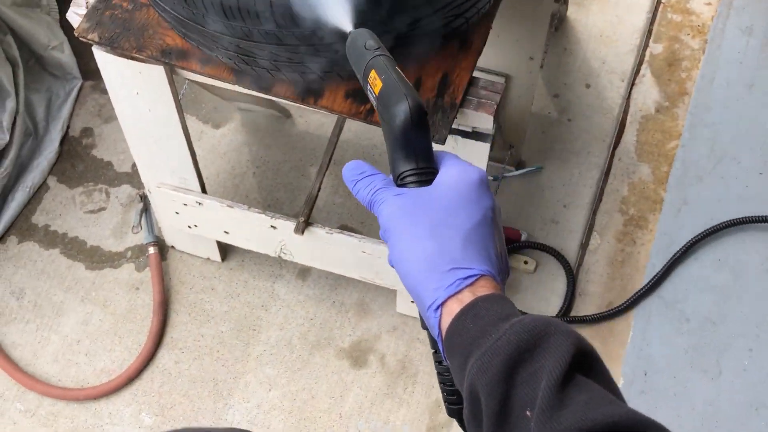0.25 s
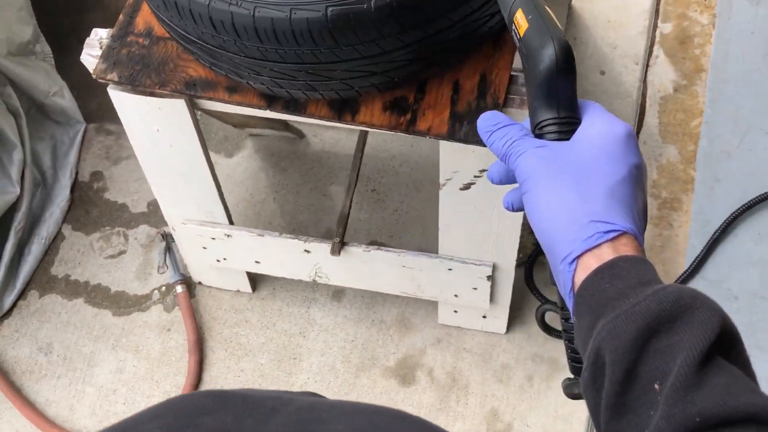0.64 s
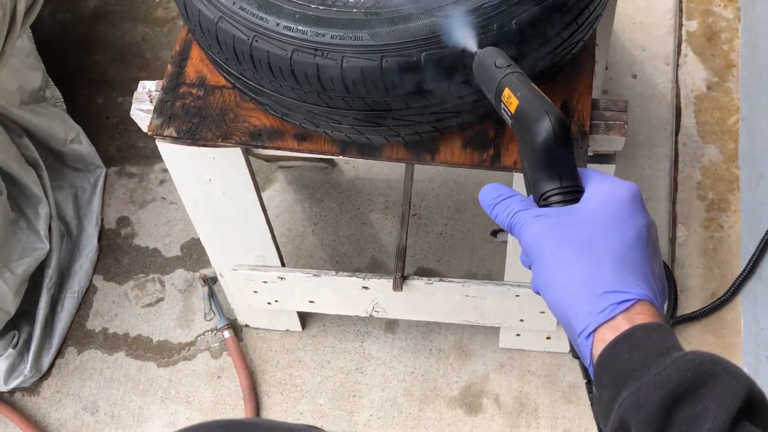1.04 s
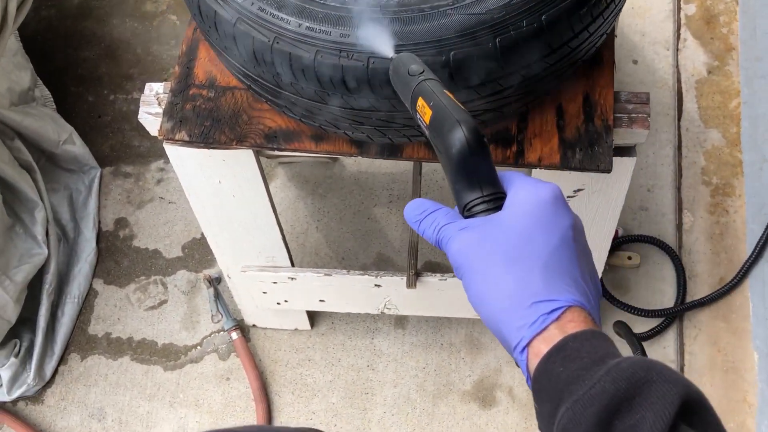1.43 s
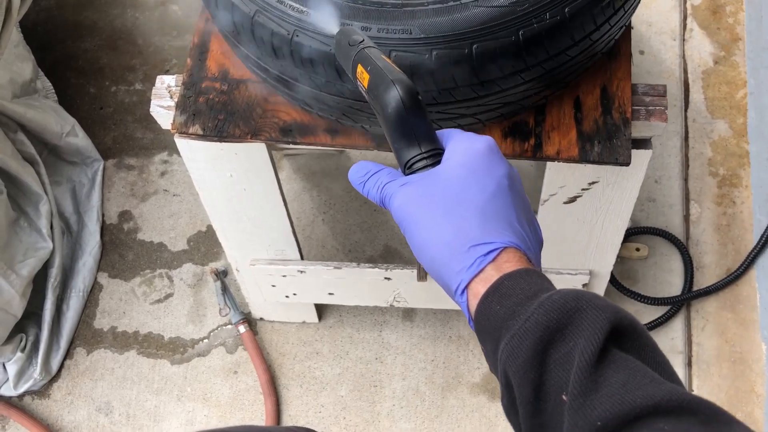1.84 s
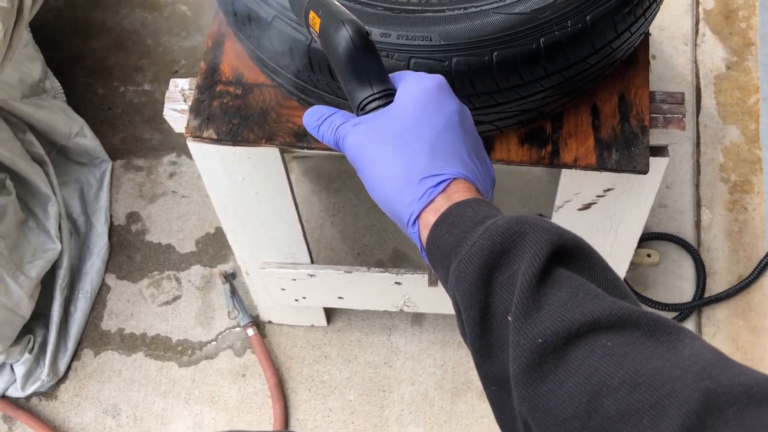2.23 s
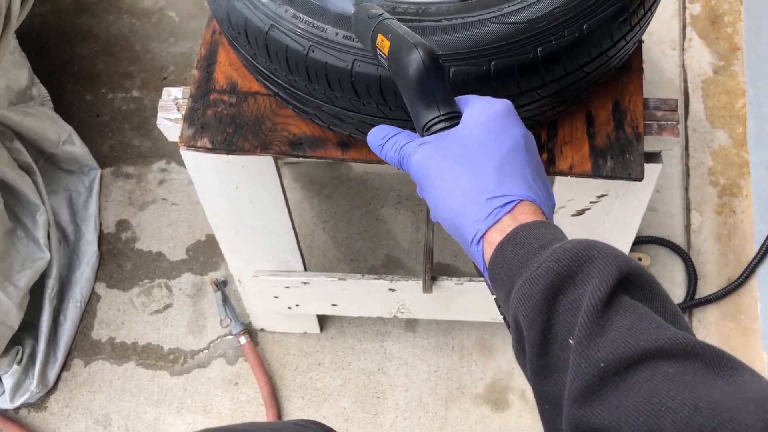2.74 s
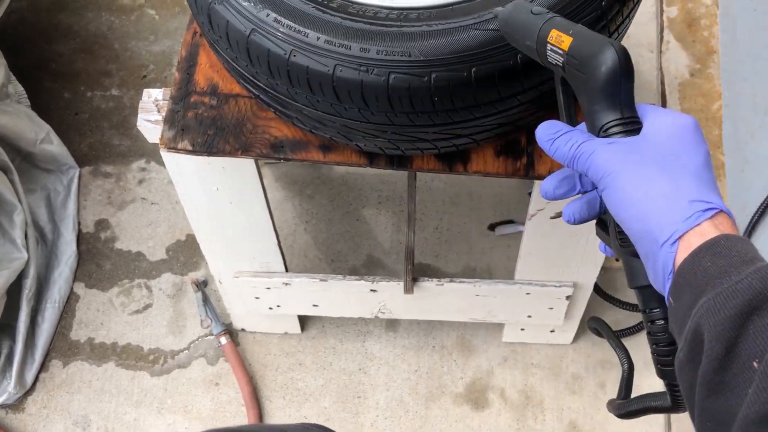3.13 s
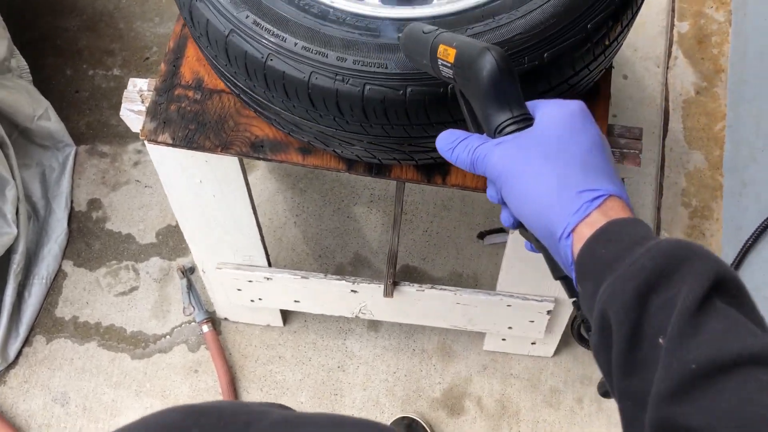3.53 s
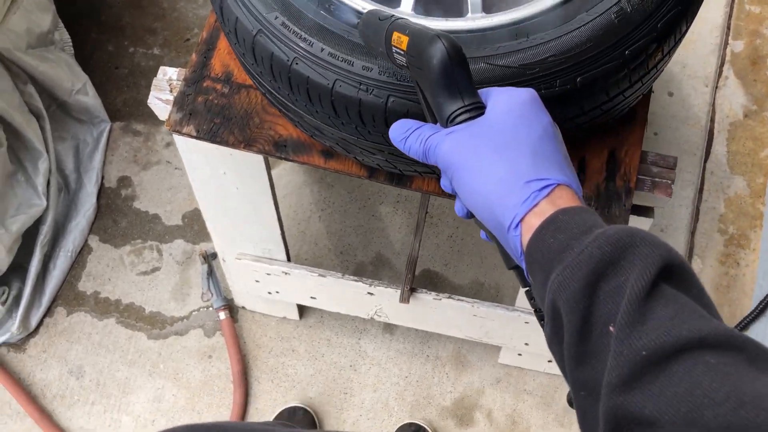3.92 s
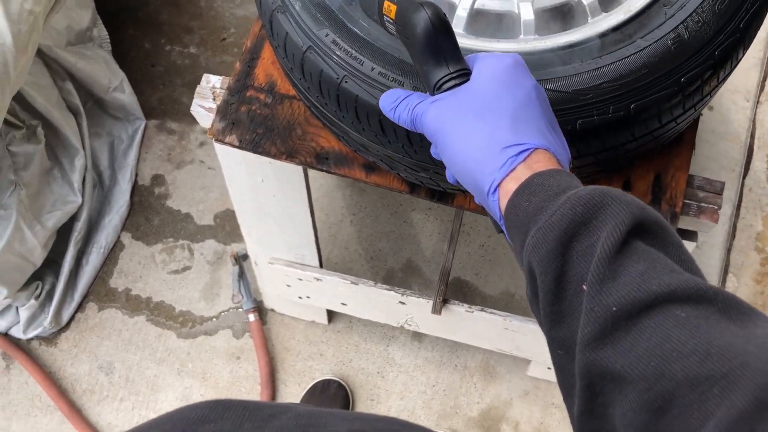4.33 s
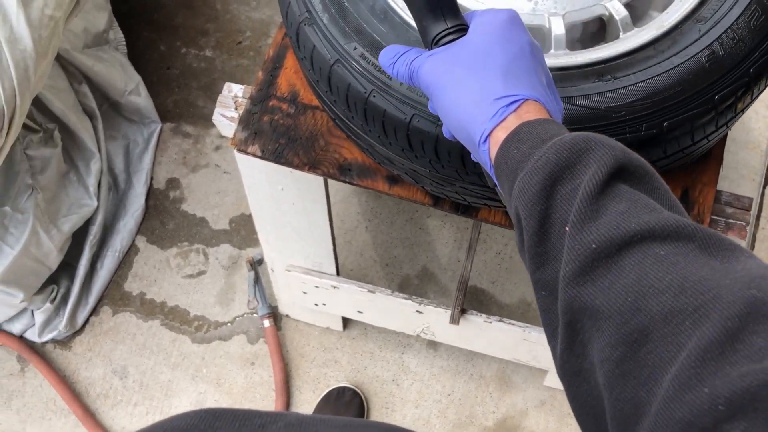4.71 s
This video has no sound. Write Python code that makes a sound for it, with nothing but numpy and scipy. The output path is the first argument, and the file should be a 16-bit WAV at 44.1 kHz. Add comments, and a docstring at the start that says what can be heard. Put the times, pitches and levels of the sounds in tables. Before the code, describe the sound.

Three bursts of bright, crackling steam hiss, heard very close in mono. The first is short and sputtering, the second lasts about two seconds, the third continues to the end. Shifting echoes off tyre and metal colour the hiss, over faint hollow roar and air buffeting. Brief pauses reveal trigger clicks, a low noisy machine hum and the workshop's fading ring.

```python
"""A hand-held steam gun sprays a car wheel in a workshop in three bursts, close to a mono microphone.
The jet is hissing noise with sparse droplet crackle; short moving echoes off the wheel draw bands through it.
Steam makes noise ring in the hollows of the wheel, gusts buffet the microphone and water coughs from the nozzle.
The first burst is already under way and the last runs to the end; in the pauses a machine hums in noisy bands,
the room rings out and the trigger clicks."""
import sys
import numpy as np
from scipy import signal
from scipy.fft import rfft, irfft
from scipy.io import wavfile
from scipy.ndimage import uniform_filter1d, map_coordinates

SR = 44100
rng = np.random.default_rng(int(sys.argv[2]) if len(sys.argv) > 2 else 0)


def to_wav(s):
    """Save 16-bit WAV."""
    ch = np.atleast_2d(s).T  # columns
    pcm = np.round(np.clip(ch, -1, 1) * 32767)  # PCM
    wavfile.write(sys.argv[1], SR, pcm.astype(np.int16))


N = 218898  # samples


def gain_of(db):
    """Turns decibels into an amplitude factor."""
    return 10 ** (np.asarray(db) / 20)


def evened(x):
    """Brings a signal to an rms of one."""
    return x / np.sqrt(np.mean(x ** 2) + 1e-20)


def level_at(points, hz):
    """Reads a spectrum between its points, along a logarithmic frequency scale."""
    point_hz, db = np.transpose(points)
    return np.interp(np.log(hz + 1), np.log(point_hz + 1), db)


def wander(db, seconds):
    """Random level changes: db is their rms size, seconds the length of the smoothing window."""
    window = np.hanning(round(seconds * SR))
    smooth = signal.oaconvolve(rng.standard_normal(N), window, "same")
    return gain_of(db * evened(smooth))


def coloured(x, points, patchy_db):
    """Shapes a sound by a spectrum, lets patches of it drift in level and evens the result."""
    size, hop = 1024, 256  # samples
    hz = np.fft.rfftfreq(N, 1 / SR)
    shaped = irfft(rfft(x) * gain_of(level_at(points, hz)), N)
    z = signal.stft(shaped, nperseg=size, noverlap=size - hop)[2]
    patches = rng.standard_normal(z.shape[::-1]).T
    patches = uniform_filter1d(patches, size=50, axis=1)  # along time
    patches = evened(uniform_filter1d(patches, size=4, axis=0))  # along frequency
    patchy = signal.istft(z * gain_of(patchy_db * patches), nperseg=size, noverlap=size - hop)[1]
    return evened(patchy[:N])


def spray_db(axis):
    """One layer's level over time at full pressure, as the gun works over the wheel."""
    # Spray levels before pressure, fluctuation and mixing. Each row: time in seconds, then levels in dB of
    # the hiss, the splash on the wheel, the broad roar, the lower hollow and the upper hollow.
    spray = [(0, -14, -22.5, -38.5, -40, -50), (.3, -13.5, -22.5, -37, -47, -48),
             (.4, -15.5, -19.5, -31, -38, -43), (.86, -14.5, -28.5, -41.5, -48.5, -54.5),
             (1.2, -12.5, -23.5, -40, -39.5, -49), (1.5, -14.5, -27.5, -41.5, -46, -54),
             (1.9, -14, -27, -43.5, -46.5, -52), (2.3, -15, -23, -41, -43, -55),
             (2.6, -14.5, -25, -41.5, -41.5, -46.5), (2.8, -13.5, -27, -39, -35, -41),
             (2.9, -12.5, -19.5, -36, -32, -50), (3.3, -13.5, -27, -38, -42, -46),
             (3.5, -14, -25, -37, -38, -43.5), (3.9, -14, -26, -35.5, -39, -42.5),
             (4.3, -14, -23.5, -37, -34, -39.5), (4.55, -15.5, -25, -38, -35.5, -45),
             (4.75, -13, -24.5, -40.5, -35, -44.5), (4.96, -15.5, -26, -39, -40.5, -48)]
    rows = np.array(spray)
    return np.interp(np.arange(N) / SR, rows[:, 0], rows[:, axis])


def played(db, follows, rise_s):
    """Trigger builds pressure up, holds it and bleeds it off; a layer follows by its own share of the dB."""
    # Pulls of the trigger. Each row: pulled in seconds, pressure build-up in seconds, let go in seconds.
    bursts = [(-1, .01, .35), (.787, .028, 2.82), (3.24, .005, 6)]
    start_db = -6  # pressure of the first steam, below full
    bleed_s, bleed_db_per_s, shut_db_per_s = .16, -105, -420  # the hose empties, then the flow breaks off
    t, out = np.arange(N) / SR, np.zeros(N)
    for pulled, build, let_go in bursts:
        pressure_db = start_db * np.clip(1 - (t - pulled) / build, 0, 1)
        pressure_db = pressure_db + bleed_db_per_s * np.clip(t - let_go, 0, bleed_s)
        shut_db = shut_db_per_s * np.maximum(t - let_go - bleed_s, 0)
        onset = np.clip((t - pulled) / rise_s, 0, 1)
        out += onset * gain_of(follows * pressure_db + shut_db)
    return out * gain_of(db)


def steam():
    """The free jet carries the top; its impact on rubber and metal fills the middle and a broad roar."""
    # Spectra of the free jet, its splash on the wheel and the broad roar.
    # Each row: frequency in Hz, relative density in dB per Hz.
    jet_spectrum = [(1000, -68), (2940, -45), (5000, -12), (6450, -6.5), (9040, 0), (11100, 1), (13000, 1),
                    (15100, 3.5), (16000, -5)]
    splash_spectrum = [(300, -55), (1000, -24), (2200, -13.5), (2600, -7), (3500, -5), (5230, -4),
                       (6320, -4.5), (7000, -2), (9100, -8), (15400, -58)]
    wash_spectrum = [(60, -44), (130, -22), (200, -2), (350, 6), (600, 0.5), (1000, -1), (1500, -2),
                     (2100, -3.5), (2400, -5.5), (3200, 0.5), (6000, -48.5)]
    sputter = wander(0.89, 0.032) * wander(0.53, 0.0019) * wander(0.39, 0.12)
    jet = coloured(turbulence(-8, 1500), jet_spectrum, 0.86)
    jet = jet * played(spray_db(axis=1), 0.97, 0.0038)
    splash = coloured(turbulence(-10.5, 1200), splash_spectrum, 0.67)
    splash = splash * played(spray_db(axis=2), 0.75, 0.003) * wander(1.46, 0.2)
    wash = coloured(rng.standard_normal(N), wash_spectrum, 2.1)
    wash = wash * played(spray_db(axis=3), 0.35, 0.0055) * wander(1.9, 0.092)
    direct = echoed(jet + splash) * sputter + gain_of(1.5) * wash
    return reflected(direct, -7.5, 0.13) + room_tail(direct, -30.5, 1.0)


def turbulence(crackle_db, per_s):
    """Smooth noise with sparse sharp droplet impacts of uneven size, per_s of them a second on average."""
    size = gain_of(3.1 * np.minimum(rng.exponential(1, N), 4)) * rng.choice([-1, 1], N)
    impacts = size * (rng.random(N) < per_s / SR)
    return rng.standard_normal(N) + gain_of(crackle_db) * evened(impacts)


def echoed(x):
    """Adds reflections whose paths change as the gun moves over the wheel."""
    # Echo off the wheel with an inverted twin just behind it.
    # Each row: time in seconds, delay in ms, strength, strength of the twin (strengths as amplitude ratios).
    wheel_echo = [(0, .28, .12, 0), (.5, .285, .2, -.08), (.85, .335, .1, -.12), (1.3, .335, .12, -.1),
                  (1.55, .32, .05, 0), (1.85, .298, .1, -.23), (2.25, .222, .24, -.16),
                  (2.47, .19, .12, -.12), (2.75, .235, .23, -.17), (3.05, .262, .28, -.22),
                  (3.3, .245, .25, -.28), (3.55, .217, .42, -.12), (3.8, .19, .35, 0), (3.82, .19, 0, 0),
                  (3.83, .285, 0, 0), (3.9, .272, .3, -.15), (4.15, .23, .12, -.05), (4.4, .27, .15, -.08),
                  (4.75, .29, .15, -.1), (4.96, .275, .18, 0)]
    # Weaker echoes off the tyre and the bench that come and go, one list for each.
    # Each row: time in seconds, delay in ms, strength as an amplitude ratio.
    passing_echoes = [
        [(.8, .17, .08), (1.15, .195, .25), (1.6, .22, .29), (1.95, .21, .1), (2.05, .21, 0)],
        [(0, .43, .15), (.3, .42, .05), (1.1, .43, .17), (1.45, .41, .05), (1.9, .38, .2), (2.5, .27, .06),
         (2.8, .33, .1), (3, .34, 0)],
        [(.5, .5, 0), (.9, .53, .14), (1.55, .58, .15), (1.9, .57, .22), (2.3, .5, .1), (2.9, .51, .18),
         (3.4, .47, .05), (4, .42, .12), (4.4, .43, .12), (4.7, .53, .1), (4.96, .52, .14)],
    ]
    twin_ms = .046  # how far the twin trails the wheel echo
    s, ms, strength, twin = np.transpose(wheel_echo)
    paths = [(s, ms, strength), (s, ms + twin_ms, twin), *map(np.transpose, passing_echoes)]
    n, out, power = np.arange(N), x, 1
    for path_s, path_ms, path_strength in paths:
        # the swirling cloud makes the echo unsteady
        amount = np.interp(n / SR, path_s, path_strength) * wander(2.6, 0.095)
        delay = np.interp(n / SR, path_s, path_ms) * SR / 1000  # samples
        out = out + amount * map_coordinates(x, [n - delay], order=5)
        power = power + amount ** 2
    return out / np.sqrt(power)


def reflected(x, db, t60, count=13):
    """Floor, bench and walls return early reflections that comb the hiss; the pattern drifts with the gun."""
    place, out = np.arange(N) / N * (count - 1), np.zeros(N)
    for k in range(count):
        at, coin = rng.random((40, 2)).T
        at = (.001 + .03 * at ** 2) * SR  # 1 to 31 ms late, crowded towards the early end
        taps = np.zeros(SR // 10)
        np.add.at(taps, at.astype(int), np.sign(coin - .5) * gain_of(-60 * at / SR / t60))
        here = np.cos(np.pi / 2 * np.clip(place - k, -1, 1))  # neighbouring patterns cross-fade at equal power
        out += here * signal.oaconvolve(x, taps / np.linalg.norm(taps))[:N]
    duller = signal.lfilter(*signal.butter(1, 13000, fs=SR), out)
    return x + gain_of(db) * duller


def room_tail(x, db, t60):
    """The workshop rings on after the jet stops, losing its top first."""
    t = np.arange(SR) / SR
    low, high = rng.standard_normal((2, SR))
    low = signal.lfilter(*signal.butter(2, 6000, fs=SR), low)
    tail = low * gain_of(-60 * t / t60) + .5 * high * gain_of(-60 * t / (0.43 * t60))
    return gain_of(db) * signal.oaconvolve(x, tail / np.linalg.norm(tail))[:N]


def roar():
    """Steam excites the wheel's hollows, and puffs of air buffet the microphone."""
    # Air modes of the wheel, lower then upper. Each row: frequency in Hz, resonator width in Hz.
    air_modes = [(245, 85), (620, 60)]
    # Spectrum of the buffeting. Each row: frequency in Hz, relative density in dB per Hz.
    buffet_spectrum = [(25, -35), (45, -6), (52, -5), (80, -10.5), (120, -1), (170, -1), (300, -25),
                       (700, -16), (1200, -41)]
    # Gusts of spent steam at the microphone, before fluctuation.
    # Each row: centre in seconds, length in seconds between the 1/e points, level in dB.
    gust_rows = [(0.037, 0.086, -48), (0.198, .07, -43), (0.389, 0.093, -32), (0.8, 0.056, -45),
                 (.94, 0.054, -50), (2.438, 0.096, -43.5), (2.886, .1, -43)]
    draught_db = -57.5  # buffeting under the gusts at full pressure, before fluctuation
    low, high = (hollow(*mode) for mode in air_modes)
    buffet = coloured(rng.standard_normal(N), buffet_spectrum, 1.0) * wander(2.9, 0.031)
    low = low * played(spray_db(axis=4), 0.71, .009) * wander(1.9, 0.091)
    high = high * played(spray_db(axis=5), 0.53, 0.0082) * wander(2.5, 0.066)
    t = np.arange(N) / SR
    gusts = sum(gain_of(db) * np.exp(-(2 * (t - s) / length) ** 2) for s, length, db in gust_rows)
    draught = played(draught_db, .3, .02) * wander(2.9, .12)
    return (low + high) * wander(0.54, 0.03) + buffet * (gusts + draught)


def hollow(hz, width):
    """Noise ringing in one air mode, sharpened by passing the same resonator twice."""
    mode = signal.iirpeak(hz, hz / width, SR)
    once = signal.lfilter(*mode, rng.standard_normal(N))
    return evened(signal.lfilter(*mode, once))


def puffs():
    """Slugs of condensed water cough out of the nozzle: soft swells of low noise over an octave wide."""
    # Coughs. Each row: centre in seconds, length in seconds at half height, level in dB, band middle in Hz.
    coughs = [(0.073, .07, -33, 450), (0.201, 0.029, -29.5, 396), (.25, 0.045, -33.5, 450),
              (0.326, 0.038, -31, 423), (.385, .06, -35, 447), (.817, .04, -32.5, 406),
              (2.898, 0.054, -41, 300)]
    out = np.zeros(N)
    for s, length, db, hz in coughs:
        swell = np.hanning(round(2 * length * SR))
        band = signal.butter(2, [hz / 1.54, hz * 1.61], "band", fs=SR, output="sos")
        noise = evened(signal.sosfilt(band, rng.standard_normal(SR // 4)))
        start = round((s - length) * SR)
        out[start:][:len(swell)] += gain_of(db) * swell * noise[:len(swell)]
    return out


def clicks():
    """Trigger clicks and loud droplet snaps: each a broad tick of noise that dies within milliseconds."""
    # Each row: start in seconds, level in dB before the decay, frequency in Hz that the band lies around.
    ticks = [(.378, -8, 7060), (.694, -45, 5900), (0.786, -27, 4960), (2.938, -19.5, 3500),
             (3.157, -39.5, 3530), (3.227, -38, 1830), (3.2392, -30, 3500)]
    out, t = np.zeros(N), np.arange(300) / SR
    for s, db, hz in ticks:
        band = signal.butter(2, [hz / 2.4, hz * 1.74], "band", fs=SR, output="sos")
        tick = signal.sosfilt(band, rng.standard_normal(len(t)))
        out[round(s * SR):][:len(t)] += evened(tick) * gain_of(db - 60 * t / 0.013)  # 60 dB down in 13 ms
    return out


def shop():
    """A machine hums in a few noisy bands."""
    # Spectrum of the hum. Each row: frequency in Hz, relative density in dB per Hz.
    hum_spectrum = [(24, -31.5), (40, -8), (106, -10), (175, -12.5), (344, -8), (410, -4.5), (488, -5.5),
                    (766, -12.5), (1090, -20), (1170, -17), (1430, -18), (1580, -11.5), (1980, -26),
                    (4640, -28.5), (15800, -59)]
    # The hum stands out in the pauses. Each row: time in seconds, level in dB.
    hum_levels = [(.45, -51), (.55, -34), (.75, -39), (.9, -52.5), (2.9, -49.5), (3.08, -44), (3.2, -45.5),
                  (3.35, -50)]
    s, db = np.transpose(hum_levels)
    hum = coloured(rng.standard_normal(N), hum_spectrum, 3.0)
    return hum * gain_of(np.interp(np.arange(N) / SR, s, db))


def thinned(x):
    """One band of the sound thins out for an instant at each dip."""
    # Dips; those shorter than their 13 ms fade stay shallower than the depth given.
    # Each row: centre in seconds, length in seconds, depth in dB, lower edge in Hz, upper edge in Hz.
    dips = [(0.281, 0.017, 15, 100, 5730), (0.859, 0.015, 14, 100, 5530), (1.21, 0.019, 12.5, 100, 7500),
            (1.95, 0.011, 17, 100, 7200), (2.532, 0.016, 13.5, 400, 7950), (2.7, 0.0081, 17, 806, 7000),
            (2.855, 0.018, 7.5, 495, 7900), (3.739, 0.013, 14.5, 100, 6960), (4.299, 0.02, 13, 100, 8400),
            (4.366, 0.052, 35, 350, 6900), (.768, .02, 5.5, 2520, 16500), (3.091, .02, 7, 2000, 16500),
            (3.178, 0.018, 8, 2000, 16500), (4.437, 0.012, 18, 500, 6700), (4.715, 0.013, 15.5, 100, 6670)]
    t, hz, spectrum, out = np.arange(N) / SR, np.fft.rfftfreq(N, 1 / SR), rfft(x), x
    for s, length, db, low_hz, high_hz in dips:
        band = irfft(spectrum * (hz > low_hz) * (hz < high_hz), N)
        inside = np.clip((length / 2 - abs(t - s)) / 0.013 + .5, 0, 1)
        out = out - band * (1 - gain_of(-db * inside))
    return out


def scene():
    """All sources reach both channels alike."""
    mixed = steam() + roar() + puffs() + shop() + clicks()
    return np.tile(thinned(mixed), (2, 1))


def record(dry):
    """The microphone drops the deepest bass; the top is band-limited and peaks clip at full scale."""
    edge_hz = 15850
    bass_cut = signal.butter(4, 45, "high", fs=SR, output="sos")
    dry = signal.sosfilt(bass_cut, dry)
    top_cut = signal.firwin(1023, edge_hz, window=("kaiser", 9), fs=SR)
    limited = signal.oaconvolve(dry, top_cut[None], "same")
    return np.clip(limited, -1, 1)


dry = scene()
out = record(dry)
to_wav(out)
```